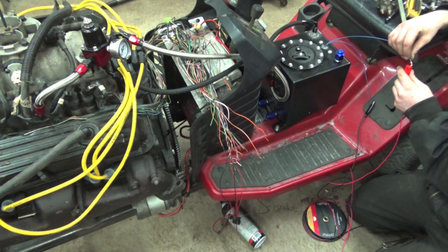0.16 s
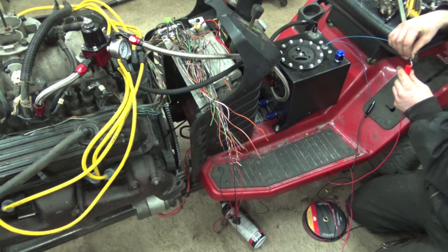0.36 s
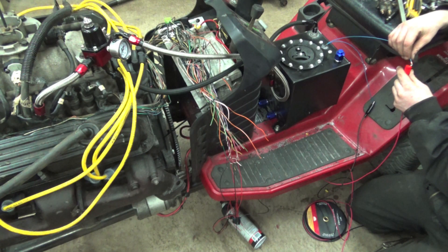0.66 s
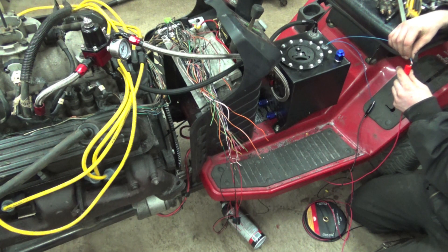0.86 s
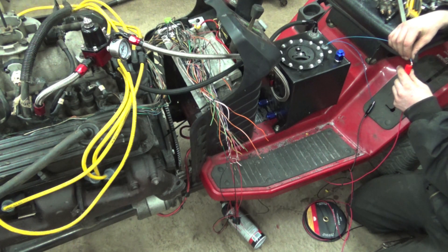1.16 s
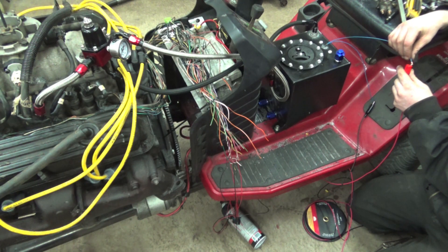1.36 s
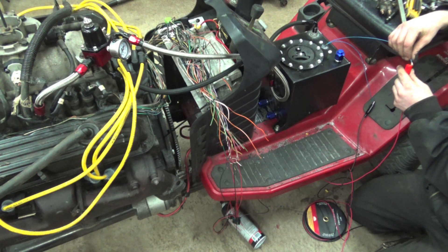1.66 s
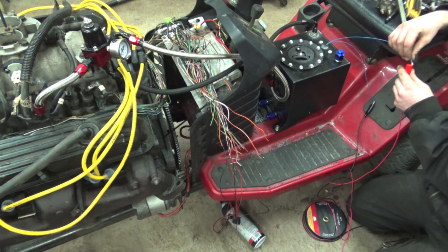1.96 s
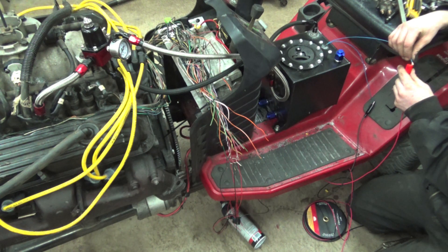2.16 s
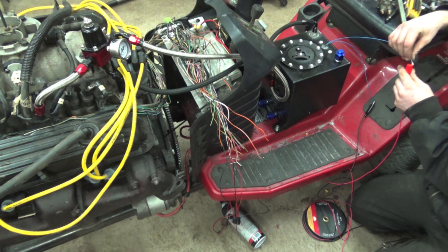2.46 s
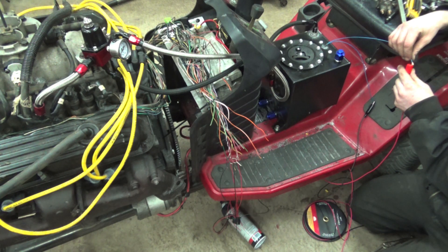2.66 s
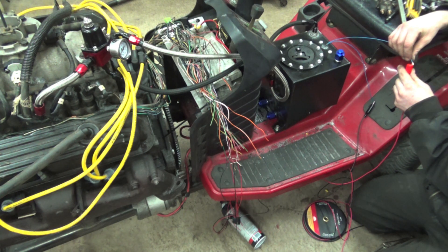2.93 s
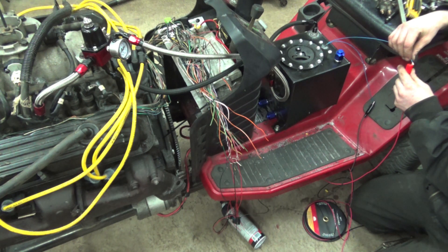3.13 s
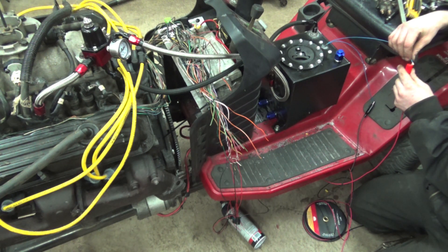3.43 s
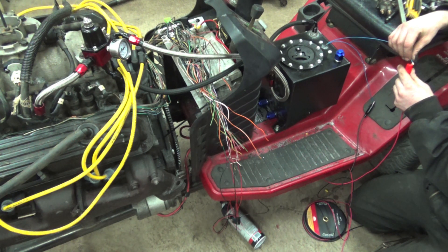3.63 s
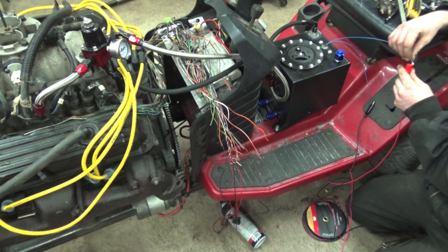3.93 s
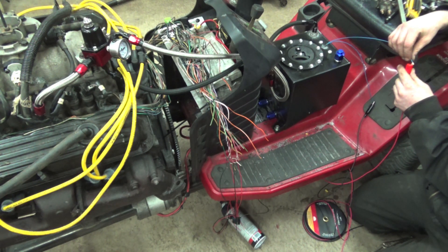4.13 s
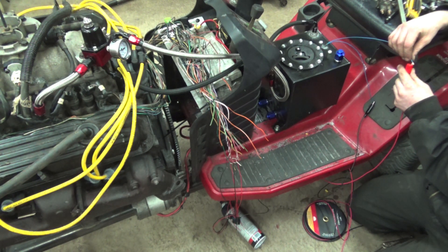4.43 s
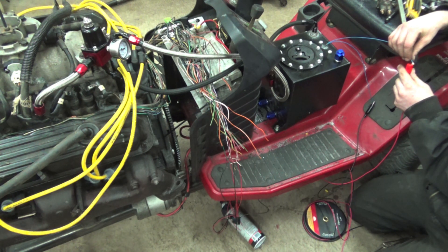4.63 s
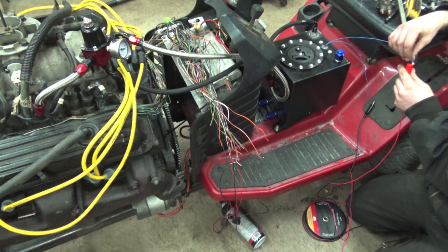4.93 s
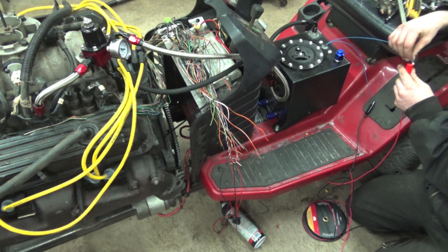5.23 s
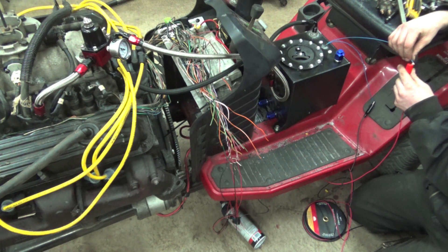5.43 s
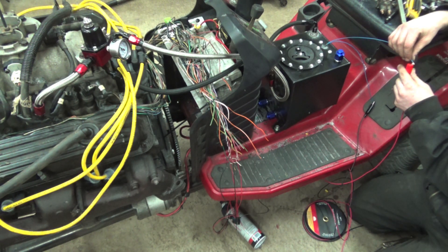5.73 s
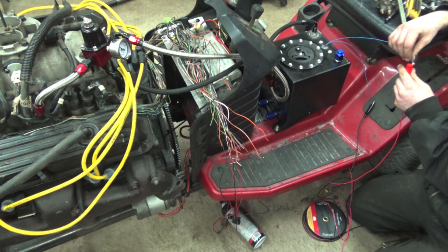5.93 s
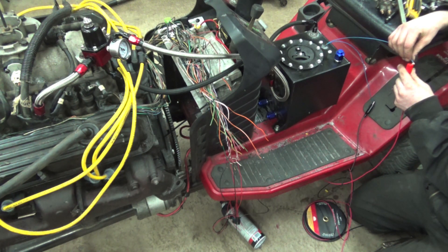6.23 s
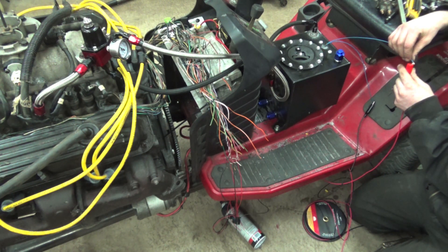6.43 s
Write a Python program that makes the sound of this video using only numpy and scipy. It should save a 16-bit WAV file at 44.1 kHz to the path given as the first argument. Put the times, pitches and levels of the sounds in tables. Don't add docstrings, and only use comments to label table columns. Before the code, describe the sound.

Quiet workshop air and a faint lamp buzz open the scene. At 0.1 s a bright crack and thump start an electric fuel pump: a harsh, rattling, hissing burst with a thin wavering squeal near 10 kHz, coasting down after 0.46. A weaker retry comes at 0.56-0.65, then clicks and brief spurts around 0.77, 0.84, 1.02, 1.31 and 1.49. At 1.64 the contact holds; by 2 s the loose rattle settles into a buzzy, tank-ringing drone with a high whine and wet hiss. Rattle skips roughen it near 2.7 and 3.15, and tones surge and flutter as air pockets pass, frothing around 3.7. From 3 s the pitch sags, faster between 4.5 and 5.8, falling by more than a quarter overall. It then holds a lower, steady drone until the end at about 6.6 s, still running, with a diffuse room tail.

```python
import sys
import numpy as np
from scipy import signal
from scipy.fft import rfft, irfft, next_fast_len
from scipy.io import wavfile
from scipy.ndimage import uniform_filter1d

SR = 44100
rng = np.random.default_rng(int(sys.argv[2]) if len(sys.argv) > 2 else 0)


def to_linear_factor(level_db):
    exponent = np.asarray(level_db, float) / 20
    return 10 ** exponent


def inscribe(sig):
    pcm = np.round(np.clip(np.atleast_2d(sig).T, -1, 1) * 32767)
    wavfile.write(sys.argv[1], SR, pcm.astype(np.int16))


N = 290178

# (time [s], stage)
PRESSURE = [
    (1.7, 0.63),
    (3.2, 0.091),
    (3.6, 0.79),
    (4.3, 1.12),
    (5.55, 1.34),
    (5.8, 1.86),
    (6.58, 2.3),
]
# (time [s], level [dB])
FLOW = [(.45, -7.5), (.62, -2.5), (1.55, 0), (1.72, 2), (2.2, 1.5), (2.55, 3.5), (3.15, 4), (3.9, 2.5),
        (4.7, 5), (5.0, 3), (5.85, -0.5)]
# (frequency [Hz], width [Hz], level [dB])
TANK = [(158.3, 4.9, -12.5), (202, 18, -7.5), (322, 54, -8.5), (356.6, 16, 2), (435, 30.4, -2),
        (488.2, 12.2, 4.5), (511, 88, -6.5), (603.4, 39, -3), (663.8, 18, -1.5), (747, 38, 0),
        (764.4, 56, -1.5), (808, 45, -3.5), (987, 200, -11.5), (1326, 45, -5), (1496, 34, -5),
        (1684, 10, -4.5), (1840, 63, -7.5), (2230, 61, -6), (2426, 65, -11.5), (2870, 280, -13)]


def rms_one(x):
    return x / np.sqrt(np.mean(x ** 2) + 1e-20)


def in_time(rows):
    s, *columns = np.transpose(rows)
    return [np.interp(np.arange(N) / SR, s, c) for c in columns]


def fine(coarse):
    return np.interp(np.arange(N) / 64, np.arange(len(coarse)), coarse)


def ramp(start_s, takes_s):
    return np.clip((np.arange(N) / SR - start_s) / takes_s, 0, 1)


def colour(x, points):
    size = next_fast_len(len(x))
    hz, db = np.transpose(points)
    grid_hz = np.maximum(np.fft.rfftfreq(size, 1 / SR), 1)
    gain = to_linear_factor(np.interp(np.log(grid_hz), np.log(hz), db))
    return irfft(rfft(x, size) * gain, size)[:len(x)]


def drift(rate_hz, count=1):
    r = np.exp(-128 * np.pi * rate_hz / SR)
    noise = rng.standard_normal((count, N // 64 + 1001))
    slow = signal.lfilter([1], [1, -2 * r, r * r], noise)[:, 1000:]
    return slow / slow.std(axis=1, keepdims=True)


def grit(per_s, spread_db):
    knock = np.cumsum(rng.random(N) < per_s / SR)
    strength = to_linear_factor(spread_db * rng.standard_normal(N))
    return rng.standard_normal(N) * strength[knock]


def resonate(x, modes, patchy_db=0.0):
    out = np.zeros(len(x))
    for k, ((hz, width_hz, db), swell) in enumerate(zip(modes, drift(0.91, count=len(modes)))):
        r = np.exp(-np.pi * width_hz / SR)
        b = (1 - r * r) / 2 * to_linear_factor(db) * (-1) ** k
        ring = signal.lfilter([b, 0, -b], [1, -2 * r * np.cos(2 * np.pi * hz / SR), r * r], x)
        out += fine(to_linear_factor(patchy_db * swell)) * ring
    return out


def tank_db(hz, between_db=-20):
    power = sum(to_linear_factor(2 * db) / (1 + (2 * (hz - mode_hz) / width_hz) ** 2) for mode_hz, width_hz, db in TANK)
    return 10 * np.log10(power + to_linear_factor(2 * between_db))


def powered_db(level_db, spin_up_db, coast_db_per_s, lag=1):
    # (closes [s], opens [s], strength [dB], spin-up [s])
    contacts = [
        (0.097, 0.46, -1.5, 0.016),
        (0.56, 0.65, -6.5, 0.017),
        (0.834, 0.87, -2.5, 0.029),
        (1.3138, 1.31, 1, 0.023),
        (1.49, 1.507, -3, 0.019),
        (1.643, 8.6, -5, 0.021),
    ]
    t, power = np.arange(N) / SR, 1e-12
    for closes_s, opens_s, db, spin_s in contacts:
        spin_up = spin_up_db * np.exp(-np.maximum(t - closes_s, 0) / spin_s / lag)
        coast = coast_db_per_s * np.maximum(t - opens_s - spin_s * (lag - 1), 0)
        power = power + (t >= closes_s) * to_linear_factor(2 * (db - spin_up - coast))
    return level_db + 10 * np.log10(power)


def surge_db(k, t):
    # (centre [s], half length [s], multiple, level [dB])
    surges = [(3.85, 0.2, 5, 13), (2.27, 0.11, 22, 7), (2.25, 0.51, 5, 5), (2.4, 0.66, 18, 6.5),
              (3.06, 0.23, 12, 11), (3.01, .28, 8, 9), (3.023, 0.25, 2, -6), (2.97, 0.48, 6, 3.5),
              (3.06, 0.13, 5, 5.5), (4.03, 0.17, 7, 9.5), (3.518, 0.3, 16, 16.5), (3.93, 0.74, 12, 15),
              (3.693, 0.4, 9, 16.5), (4, 0.19, 6, -5), (4.15, 0.14, 8, 4.5), (4.2, 0.17, 11, 12.5),
              (4.4, 0.11, 20, 6.5), (4.61, 0.12, 5, 9.5), (5.45, 0.077, 7, 12), (5.42, .1, 8, -4),
              (5.25, 0.44, 6, -12), (5.31, 0.11, 4, 17.5), (5.393, 0.15, 12, 10.5), (5.57, 0.13, 30, 8.5),
              (5.05, 0.049, 5, 5), (2.74, .04, 5, -10), (2.91, .04, 5, -8), (3.06, .1, 5, 3),
              (2.3, .3, 6, -3), (2.2, .25, 5, -2), (3.7, .25, 9, 3), (3.2, .05, 8, -4), (3.0, .15, 8, 2),
              (3.55, .15, 16, -3), (3.55, .2, 12, 3), (6.2, .4, 8, -2), (5.3, .1, 12, 5),
              (3.75, .28, 11, 6), (3.62, .1, 8, -6), (3.8, .38, 7, 3.5), (2.4, .3, 7, -5), (3.8, .4, 9, 3),
              (4.18, .14, 12, 6), (4.78, .14, 9, 4), (3.35, .08, 5, 5), (5.33, .1, 5, -5), (5.6, .08, 5, 6),
              (4.85, .07, 5, -8), (2.38, .15, 6, 3.5), (5.4, .4, 6, 3),
              (1.85, 0.6, 19, 10), (1.95, 0.18, 35, 13), (2.25, 0.12, 31, 14), (2.3, 0.18, 28, 11),
               (2.3, 0.27, 20, -8), (2.35, 0.27, 5, -4), (2.35, 0.27, 27, 11), (2.6, 0.18, 9, -12),
               (2.65, 0.18, 7, -11), (2.65, 0.27, 23, 9), (2.65, 0.4, 21, 7), (2.7, 0.6, 4, -7),
               (2.85, 0.4, 10, 6), (3.05, 0.18, 19, -10), (3.15, 0.4, 8, 3), (3.2, 0.4, 20, 7),
               (3.5, 0.18, 4, 13), (3.5, 0.18, 10, -13), (3.55, 0.12, 27, -14), (3.55, 0.18, 7, -10),
               (3.6, 0.6, 37, -10), (3.75, 0.6, 21, -7), (3.8, 0.12, 13, 12), (3.85, 0.18, 20, -14),
               (3.9, 0.27, 90, 7), (4.2, 0.12, 5, 8), (4.2, 0.12, 29, -14), (4.2, 0.4, 12, -8),
               (4.45, 0.6, 16, 9), (4.55, 0.12, 37, 13), (4.65, 0.27, 25, -7), (4.65, 0.6, 22, 11),
               (4.75, 0.27, 5, -5), (4.75, 0.27, 8, -7), (4.75, 0.6, 15, -5), (5.1, 0.4, 31, -10),
               (5.15, 0.12, 12, 11), (5.15, 0.18, 30, -14), (5.15, 0.4, 32, -13), (5.15, 0.6, 17, -7),
               (5.15, 0.6, 29, 6), (5.25, 0.27, 10, -9), (5.3, 0.6, 105, -6), (5.35, 0.27, 21, -12),
               (5.4, 0.6, 26, 9), (5.55, 0.6, 18, 13), (5.85, 0.6, 16, 8), (6.4, 0.4, 22, 11),
              (2.64, .12, 90, 7), (3.17, .14, 95, 11), (3.9, .12, 95, 5), (5.68, .08, 95, 8),
               (4.5, .14, 105, 7), (3.6, .3, 115, 6), (3.6, .22, 120, 8), (2.6, .12, 120, 8),
               (4.24, .1, 110, 5), (5.55, .15, 110, 6), (5.2, .1, 120, 6), (2.65, .2, 30, -7),
               (3.3, .25, 30, 5), (3.3, .08, 17, 10), (3.55, .15, 15, 5), (3.7, .15, 25, 5),
               (3.7, .15, 22, 5), (3.8, .25, 37, -6), (2.9, .14, 10, 4), (2.88, .14, 11, 4),
               (3.05, .14, 9, 3), (5.2, .14, 7, 4), (5.22, .14, 9, 4), (3.08, .08, 8, 3),
               (3.28, .1, 30, -5), (5.7, .12, 105, 3), (2.1, .18, 10, -4), (2.1, .18, 12, -5),
               (3.75, .2, 80, 8), (3.8, .3, 9, 2), (3.8, .25, 6, 2), (3.8, .3, 12, 3), (2.7, .6, 4, -4),
               (4.5, .2, 7, -4), (6.2, .5, 105, 2), (6.2, .5, 155, 4), (3.1, .2, 8, 2), (3.1, .2, 12, 2)]
    return sum(db * np.exp(-((t - s) / half_s) ** 4)
               for s, half_s, multiple, db in surges if round(multiple) == round(k))


def seated():
    return ramp(1.944, 0.067)


def throb(angle):
    return 1 + 0.5 * np.sin(5 * angle) + 0.056 * np.sin(angle)


def room_air():
    # (frequency [Hz], density [dB per Hz])
    shop = [(15, -40), (30, -44), (60, -7.5), (110, -11), (228, -11), (472, -24), (700, -22), (1000, -19),
            (1350, -14), (2000, -22), (2700, -20.5), (4000, -28), (9000, -31.5), (15700, -34)]
    port_difference = [(100, -13), (1000, 3.5), (6000, -7), (7500, -20)]
    air = to_linear_factor(-50.5) * rms_one(colour(rng.standard_normal(N), shop))
    apart = to_linear_factor(-53.5) * rms_one(colour(colour(rng.standard_normal(N), shop), port_difference))
    return air + apart * [[1], [-1]]


def ballast_buzz():
    # (frequency [Hz], level [dB])
    ballast = [(120, -65.5), (360, -69), (480, -62), (600, -67), (720, -62), (840, -68), (1080, -72),
               (1200, -66), (1320, -66), (1800, -71)]
    t, flicker = np.arange(N) / SR, drift(11.0, count=len(ballast))
    return sum(fine(to_linear_factor(db + 5.0 + 3 * f)) * np.sin(2 * np.pi * hz * t) for (hz, db), f in zip(ballast, flicker))


def jolts(attack_s=0.0016, crack_t60_s=0.088, thump_t60_s=0.061, ring_q=30):
    # (time [s], peak [dB], centre [Hz], low thump [dB])
    kicks = [(0.098, -18.5, 4100, -28), (0.7658, -28, 6200, -42), (0.836, -32, 1720, -34),
             (0.8774, -22.5, 3800, -37), (1.0176, -30, 5940, -46), (1.3128, -30, 1990, -24),
             (1.3638, -21, 4460, -33), (1.489, -26, 2230, -42), (1.5336, -22.5, 4200, -35),
             (1.643, -25.5, 1560, -45), (1.6857, -21.5, 4650, -32)]
    n = 4000
    out, thumps, t = np.zeros(N), np.zeros(N), np.arange(n) / SR
    skirt_band = signal.butter(4, [1500, 8000], "band", fs=SR, output="sos")
    for s, peak_db, hz, low_db in kicks:
        at = round(s * SR)
        crack_noise, thump_noise = rng.standard_normal((2, n))
        core_band = signal.butter(2, [0.73 * hz, 1.21 * hz], "band", fs=SR, output="sos")
        core = signal.sosfilt(core_band, crack_noise)
        skirt = signal.sosfilt(skirt_band, crack_noise)
        rings = sum(signal.lfilter(*signal.iirpeak(ring_hz, ring_q, fs=SR), thump_noise)
                    for ring_hz in (3320, 4640, 6960))
        crack = rms_one(rms_one(core) + 1.2 * rms_one(skirt) + 0.68 * rms_one(rings))
        fade = np.minimum(t / attack_s, 1) * to_linear_factor(peak_db - 3.5 - 60 * t / crack_t60_s)
        out[at:at + n] += fade * crack
        thumps[at:at + n] += to_linear_factor(low_db + 21.5 - 60 * t / thump_t60_s) * thump_noise
    return out + resonate(thumps, [(hz, 1.3 * width_hz, db / 3) for hz, width_hz, db in TANK[5:13]])


def squeal(wobble_hz=130.0):
    # (time [s], frequency [Hz], level [dB])
    spin_squeal = [
        (0.12, 9150, -72),
        (0.17, 9200, -44),
        (0.21, 9850, -40),
        (0.3, 9900, -42),
        (0.5, 9950, -47),
        (0.64, 10150, -41),
        (0.76, 10200, -62),
    ]
    hz, db = in_time(spin_squeal)
    wobble, flutter = drift(66, count=2)
    sounding = hz < spin_squeal[-1][1]
    phase = 2 * np.pi * np.cumsum(hz + wobble_hz * fine(wobble)) / SR
    return sounding * to_linear_factor(db - 2.0 + 3.5 * fine(flutter)) * np.sin(phase)


def chassis_shake():
    shake = colour(rng.standard_normal(N), [(15, -15), (40, -2), (70, -1), (90, -7), (150, -22)])
    return to_linear_factor(-73.5 + 21.5 * ramp(2.1, 0.8)) * rms_one(shake)


def roller_rattle():
    # (time [s], level [dB])
    slips = [
        (1.9, 0.6),
        (2.7, 6.9),
        (3.151, 4.2),
        (4.7, 2.5),
        (5.65, 1.5),
    ]
    t = np.arange(N) / SR
    rattle = rms_one(resonate(grit(160, spread_db=1.8), TANK[:12], patchy_db=0.7))
    rattle /= np.sqrt(np.sqrt(uniform_filter1d(rattle ** 2, 2500)))
    slips_db = sum(db * np.exp(-((t - s) / 0.29) ** 2) for s, db in slips)
    db = powered_db(-28.5, spin_up_db=6.7, coast_db_per_s=92) - 12.5 * seated() + slips_db
    return to_linear_factor(db) * rattle


def fuel_churn(angle):
    knocks = grit(300, spread_db=0.0) * throb(angle)
    direct = colour(knocks, [(500, -7), (1000, -4.0), (2000, -0.5), (3600, -11.0)])
    churn = rms_one(resonate(knocks, TANK[12:], patchy_db=2.5) + to_linear_factor(-17.0) * direct)
    held = np.clip((in_time(PRESSURE)[0] - 1.3) / 0.36, 0, 1)
    db = powered_db(-31, spin_up_db=5.4, coast_db_per_s=140.5) - seated() - 2.5 * held
    return to_linear_factor(db) * churn


def casing_spray(angle):
    # (frequency [Hz], width [Hz], level [dB])
    casing = [(3360, 90, -0.5), (3800, 37, 4.5), (4040, 85, -1), (4770, 11, -18), (4900, 15, -35),
              (5525, 92, -1), (6190, 230, -1), (6970, 450, 4.5), (8350, 23, -15), (8940, 120, 2.5),
              (9450, 56, -21)]
    spray = grit(500, spread_db=0.5) * throb(angle)
    spray = spray + to_linear_factor(3.5) * resonate(spray, casing, patchy_db=0.8)
    dense = rng.standard_normal((2, 1500)) * to_linear_factor(-60 * np.arange(1500) / SR / 0.04)
    dense *= 0.62 / np.linalg.norm(dense)
    empty, full = signal.fftconvolve([spray], dense, axes=1)[:, :N]
    wet, stage = wetness(), in_time(PRESSURE)[0]
    fill_rad = 5 * wet + 4 * stage + 1.5 * np.arange(N) / SR
    return spray + np.cos(fill_rad) * empty + np.sin(fill_rad) * full


def wetness():
    # (time [s], share [0-1])
    fuel = [
        (0, 0.6),
        (1.0, 0),
        (1.7, 0.53),
        (2.7, 0.74),
        (3.5, 0.84),
        (4.3, 1),
        (6.58, 1),
    ]
    return np.clip(in_time(fuel)[0], 0, 1)


def fuel_hiss(angle):
    # (frequency [Hz], density [dB per Hz])
    wet_hiss = [(1470, -17), (2500, 2), (2890, -4.5), (3370, 0), (4840, -1.5), (5690, 2), (6240, -5),
                (8050, 4.5), (15700, -13.5)]
    # (frequency [Hz], density [dB per Hz])
    dry_hiss = [(1470, -27), (2500, 0), (4350, 1.5), (4730, 8), (5690, 5.5), (7110, -2), (7450, 0.5),
                (9750, 0), (12300, -19), (15700, -31)]
    # (frequency [Hz], width [Hz], level [dB])
    dry_modes = [(4650, 42, -24), (7700, 22, 10), (10100, 80, 1)]
    # (frequency [Hz], density [dB per Hz])
    froth_hiss = [(4500, -14), (6000, -12), (6500, 0.5), (8500, 1.5), (10000, -5), (12000, -13)]
    spray, wet, flow_db = casing_spray(angle), wetness(), in_time(FLOW)[0]
    dry_spray = spray + to_linear_factor(5) * resonate(spray, dry_modes)
    hiss = wet * rms_one(colour(spray, wet_hiss)) + (1 - wet) * rms_one(colour(dry_spray, dry_hiss))
    body = colour(hiss, [(10000, 0), (11500, -30)])
    fizz = hiss - body
    body_db = powered_db(-28, spin_up_db=22, coast_db_per_s=131) + flow_db
    fizz_db = powered_db(-27.5, spin_up_db=18, coast_db_per_s=150, lag=1.1) + flow_db
    fizz_db = fizz_db + 6 * (1 - ramp(0.77, 0.5))
    froth_swell = np.exp(-((np.arange(N) / SR - 3.71) / 0.56) ** 2)
    froth = froth_swell * rms_one(colour(spray, froth_hiss))
    return to_linear_factor(body_db) * body + to_linear_factor(fizz_db) * fizz + to_linear_factor(-35) * froth


def imbalance_hum(angle, turns):
    mode_hz, width_hz = 170.4, 17.6
    carried = 1 / (1 + ((2 * turns - mode_hz) / width_hz) ** 2)
    db = powered_db(-39.5, spin_up_db=8.7, coast_db_per_s=74) + surge_db(2, np.arange(N) / SR)
    return carried * to_linear_factor(db) * np.sin(2 * angle)


def armature_whine(angle):
    # (time [s], level [dB])
    whine = [(2.0, -56), (2.18, -42), (3.05, -45), (3.11, -34), (3.35, -38.5), (3.59, -38), (3.79, -48),
             (3.95, -35), (4.27, -46), (4.4, -32), (4.64, -47), (4.86, -34), (4.97, -43), (5.22, -36),
             (5.36, -41), (5.45, -35), (5.85, -43), (6.58, -43)]
    return to_linear_factor(in_time(whine)[0] + 2 + 2.3 * fine(drift(20)[0])) * np.sin(60 * angle)


def shaft_tones(angle, turns, wander_db=1.2, roller_wander_db=2.8):
    stage_turns = [82.6, 75.5, 60.15]
    stage_tone_db = [-30.5, -34, -30.5]
    # (multiple, level [dB])
    priming = [(1, -26.5), (2, -20), (3, -44), (4, -12), (5, -4), (6, -0.5), (7, -6), (8, -13), (9, -11.5),
               (10, -18), (11, -12), (12, -22.5), (13, -16), (14, -19.5), (15, -20.5), (16, -16.5),
               (17, -41), (18, -18.5), (19, -14), (20, -22), (21, -23), (22, -9.5), (23, -21), (24, -11.5),
               (25, -22), (26, -21.5), (27, -26), (28, -24), (29, -20), (30, -14.5)]
    # (multiple, level [dB])
    filling = [(1, -39), (2, -23), (3, -19), (4, -20.5), (5, -7), (6, 0), (7, -13.5), (8, -4), (9, -17.5),
               (10, 0.5), (11, -15), (12, -30.5), (13, -16.5), (14, -15), (15, -7.5), (16, -25.5),
               (17, -17), (18, -19), (19, -27), (20, -3), (21, -15.5), (22, -26.5), (23, -14), (24, -8.5),
               (25, -8.5), (26, -17), (27, -18), (28, -18), (29, -12.5), (30, -10)]
    # (multiple, level [dB])
    loaded = [(1, -34), (2, -24), (3, -21), (4, -26), (5, -21), (6, -2), (7, -10.5), (8, 0), (9, -1.5),
              (10, -18), (11, -3.5), (12, -7), (13, -4.5), (14, -11), (15, -15.5), (16, -28), (17, -8.5),
              (18, -34), (19, -43), (20, -36), (21, -21.5), (22, -26), (23, -30), (24, -38), (25, -9.5),
              (26, -58), (27, -15), (28, -20), (29, -18), (30, -4.5)]
    # (multiple, priming [dB], filling [dB], loaded [dB])
    rollers = [(31, -26, -15, -10), (32, -22, -12, -16), (35, -27, -16, -11), (37, -26, -20, -9),
               (38, -34, -22, -15), (40, -25, -22, -16), (45, -24, -15, -28), (50, -16, -17, -26),
               (55, -25, -22, -29), (65, -21, -21, -28), (70, -25, -20, -19), (75, -19, -19, -20),
               (80, -25, -16, -29), (85, -21, -14, -27), (90, -18, -15, -21), (95, -18, -19, -35),
               (100, -28, -16, -15), (105, -25, -13, -11), (110, -23, -19, -37), (115, -22, -19, -21),
               (120, -26, -20, -21), (135, -32, -26, -18), (140, -33, -24, -20), (155, -41, -30, -17)]
    shaft = [(k, a, b, c) for (k, a), (_, b), (_, c) in zip(priming, filling, loaded) if k != 2]
    table = shaft + rollers
    stage = in_time(PRESSURE)[0]
    t, out = np.arange(N)[::64] / SR, np.zeros(N)
    high = sum(k > 40 for k, *_ in table)
    swells = [*drift(5.3, count=len(table) - high), *drift(25, count=high)]
    starts_rad = rng.uniform(0, 0.4, len(table))
    for (k, *levels_db), swell, start_rad in zip(table, swells, starts_rad):
        force_db = np.array(levels_db) - tank_db(k * np.array(stage_turns))
        db = np.interp(stage[::64], np.arange(3), force_db) + tank_db(k * turns[::64]) + surge_db(k, t)
        db += (roller_wander_db if k > 40 else wander_db) * swell
        lag_rad = 1.25 * round(k) ** 2
        out += fine(to_linear_factor(db)) * np.sin(round(k) * (angle + start_rad) - lag_rad)
    return to_linear_factor(in_time(FLOW)[0] + np.interp(stage, np.arange(3), stage_tone_db)) * out


def workshop(x, t60_s=0.62, wet_db=-6):
    # (frequency [Hz], side minus mid [dB])
    width = [(60, -25), (200, -19), (380, -22), (700, -13.5), (1290, -6), (2380, -14), (3400, -21),
             (4700, -22), (6500, -25), (8600, -24), (9400, -13.5), (10600, -16), (11800, -24), (15000, -25)]
    # (frequency [Hz], level [dB])
    lean = [(300, -76), (600, -26), (1300, -16.5), (2500, -28), (4000, -45)]
    # (frequency [Hz], level [dB])
    treble = [(2500, 0), (5000, -6), (12000, -10)]
    t = np.arange(int(0.5 * SR)) / SR
    tails = rng.standard_normal((2, len(t))) * to_linear_factor(-60 * t / t60_s) * (t > 0.004)
    tails /= np.sqrt(np.sum(tails ** 2, axis=1, keepdims=True))
    mid = x + to_linear_factor(wet_db) * colour(signal.fftconvolve(x, tails[0])[:N], treble)
    wander_db = 2.2 * fine(drift(12)[0])
    side = to_linear_factor(-4.0 + wander_db) * colour(signal.fftconvolve(x, tails[1])[:N], width) + colour(x, lean)
    return np.array([mid + side, mid - side])


def scene():
    # (time [s], speed [turns per s])
    speed = [(1.8, 84.2), (1.92, 85.4), (2.02, 85.4), (2.17, 83.8), (2.55, 83.5), (2.7, 82.9), (3.14, 82.3),
             (3.36, 80.0), (3.7, 79.6), (4.02, 77.7), (4.42, 75.1), (4.53, 74.7), (4.8, 72.15), (5.3, 67.6),
             (5.36, 66.0), (5.66, 62.3), (5.76, 60.35), (5.95, 60.15)]
    turns = in_time(speed)[0]
    angle = 2 * np.pi * np.cumsum(turns * (1 + 0.00122 * fine(drift(16.4)[0]))) / SR
    emerging = ramp(1.59, 0.47)
    tones = emerging * (shaft_tones(angle, turns) + armature_whine(angle)) + imbalance_hum(angle, turns)
    noises = chassis_shake() + roller_rattle() + fuel_churn(angle) + fuel_hiss(angle)
    pump = workshop(tones + noises + jolts())
    return room_air() + ballast_buzz() + squeal() + pump


def top_cut(x):
    return signal.sosfilt(signal.butter(12, 15860, fs=SR, output="sos"), x)


def record(dry):
    dry = signal.sosfilt(signal.ellip(10, 0.5, 60, 15850, fs=SR, output="sos"), dry)
    dry = signal.sosfilt(signal.butter(1, 45, "high", fs=SR, output="sos"), dry)
    return top_cut(dry)


dry = scene()
out = record(dry)
inscribe(out)
```